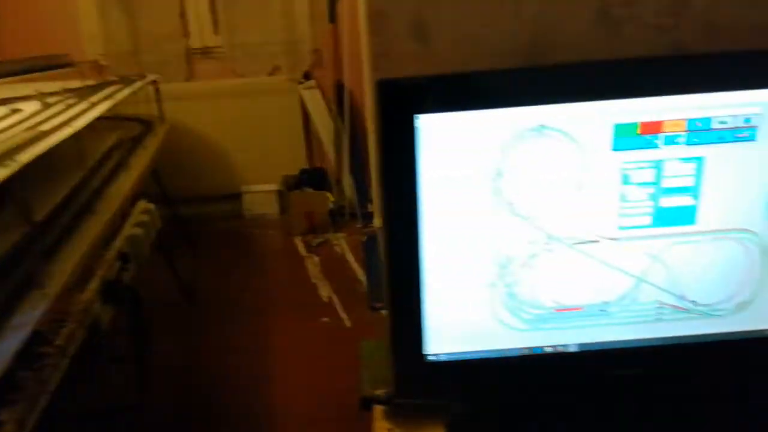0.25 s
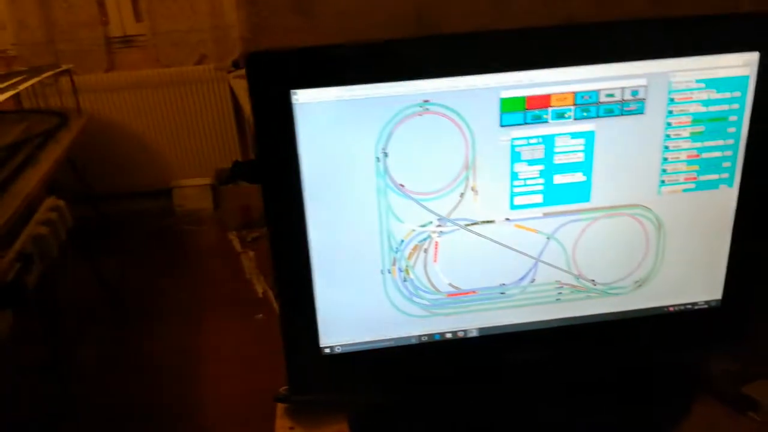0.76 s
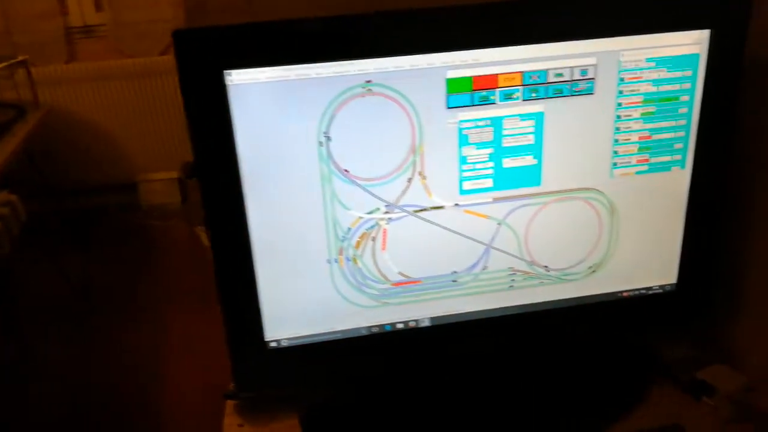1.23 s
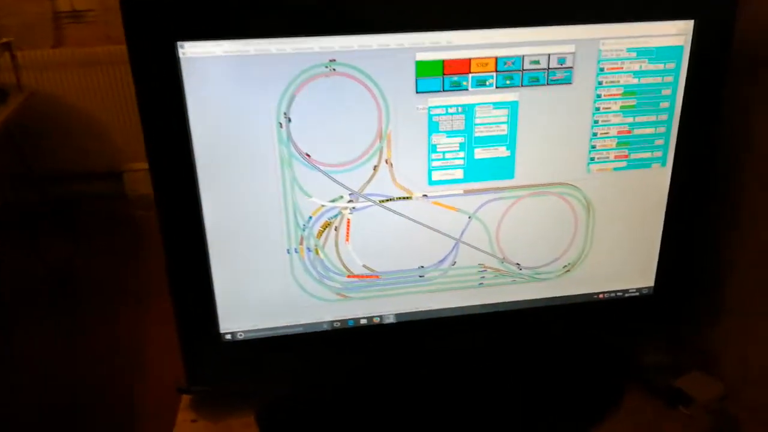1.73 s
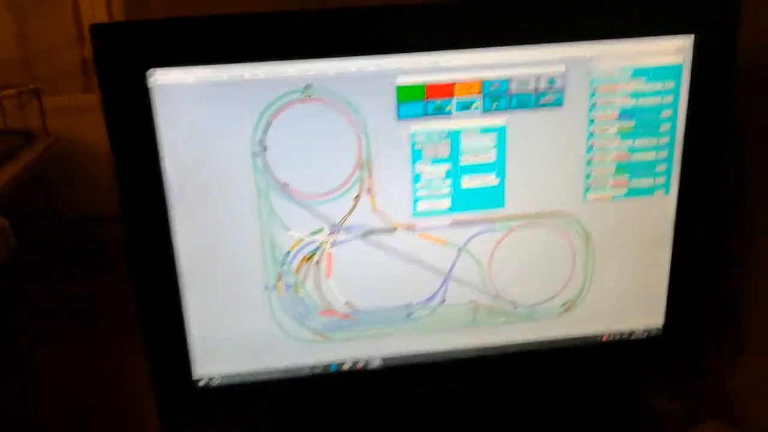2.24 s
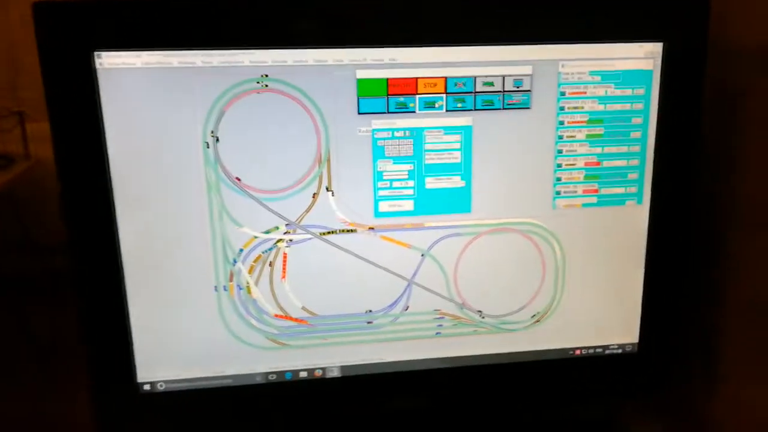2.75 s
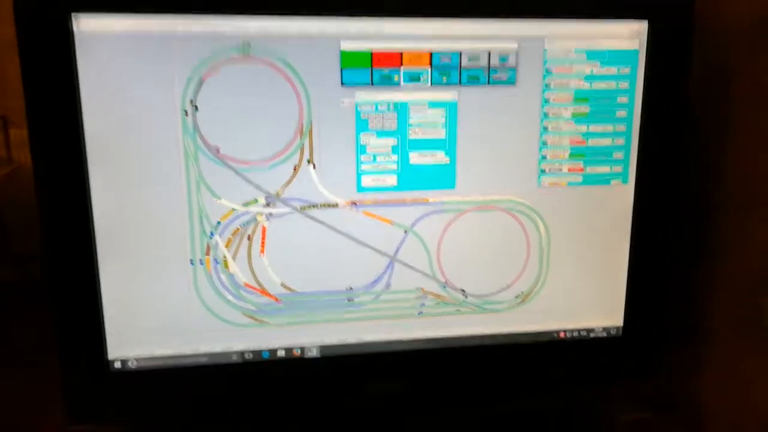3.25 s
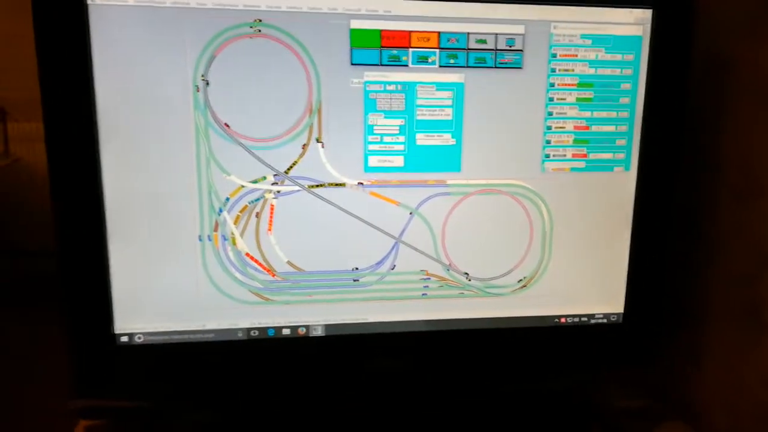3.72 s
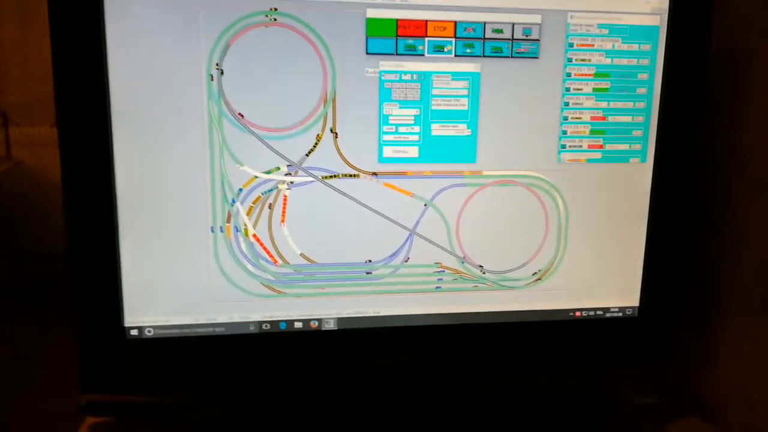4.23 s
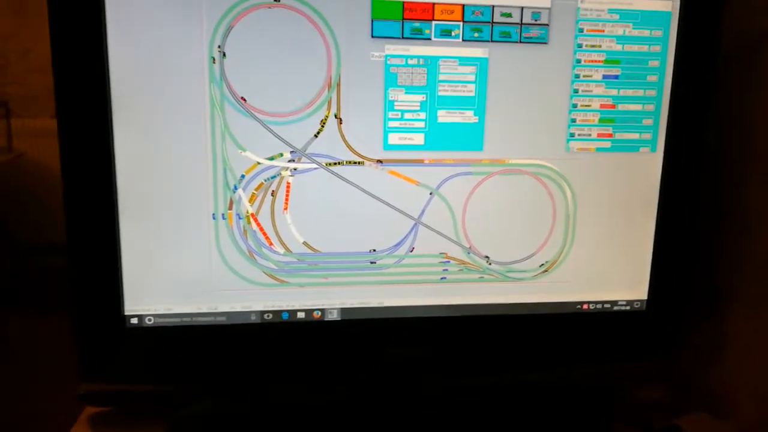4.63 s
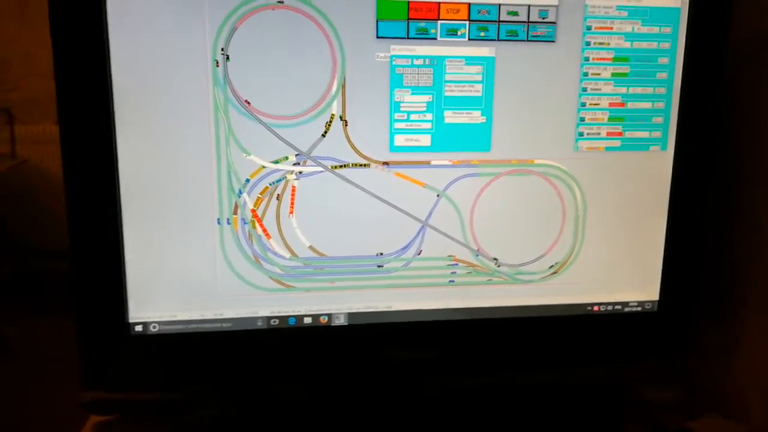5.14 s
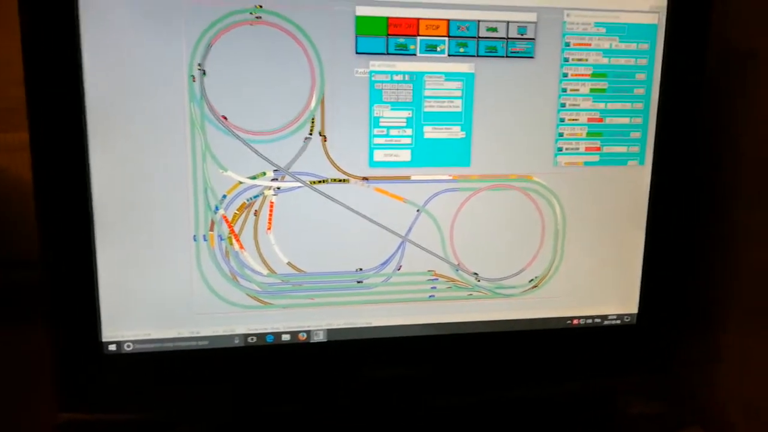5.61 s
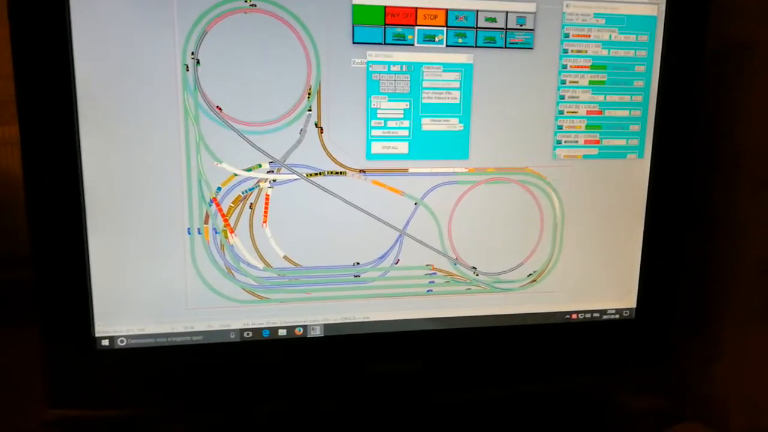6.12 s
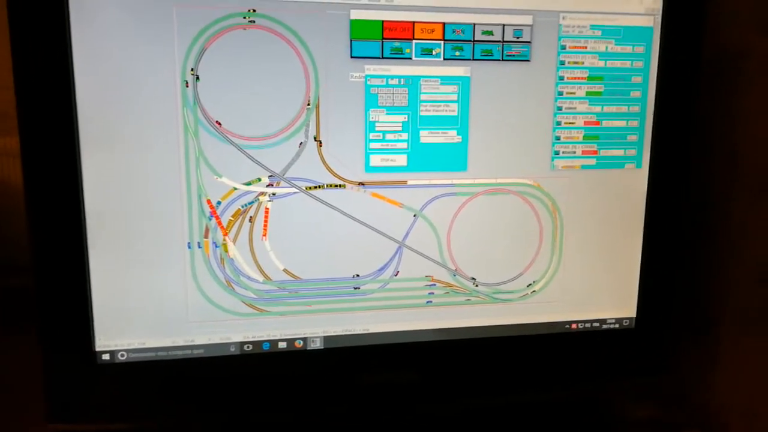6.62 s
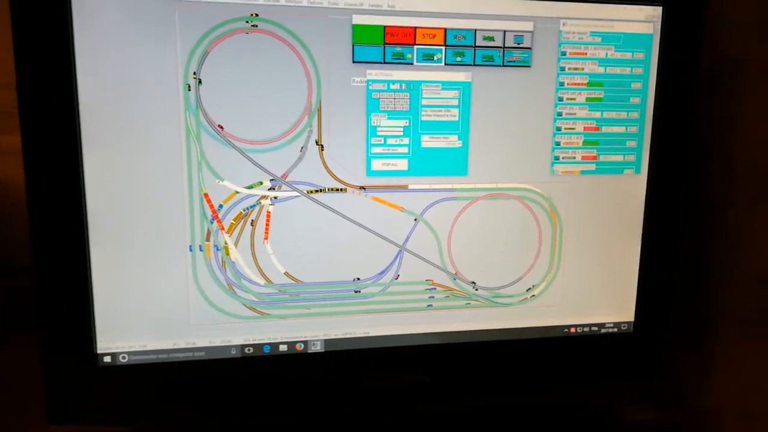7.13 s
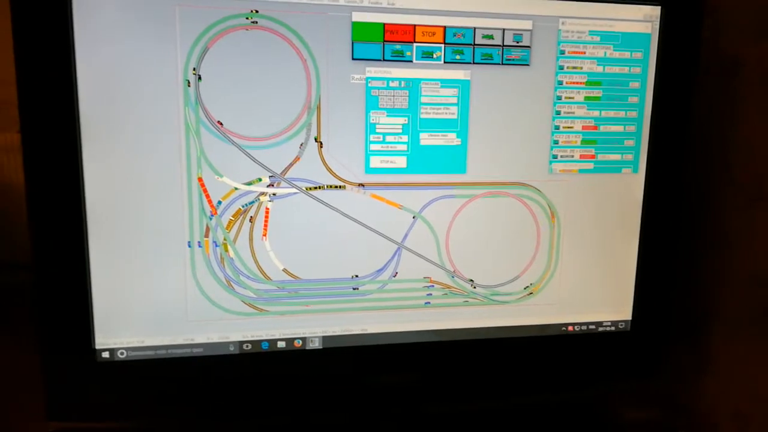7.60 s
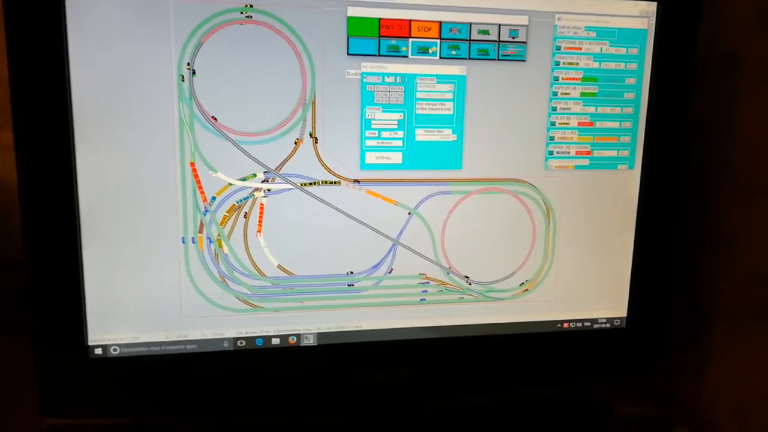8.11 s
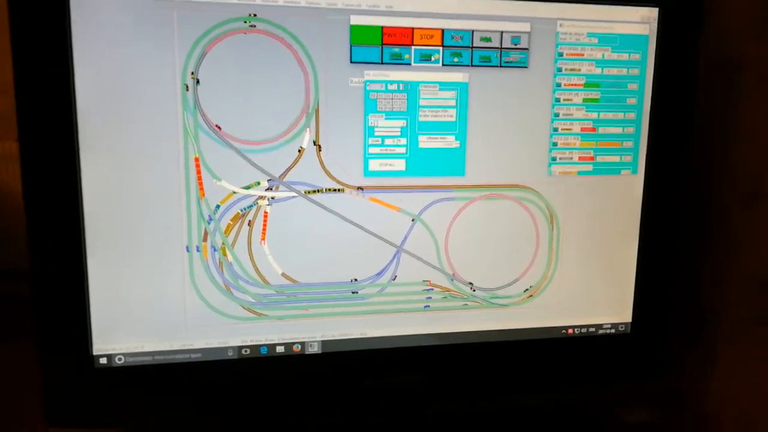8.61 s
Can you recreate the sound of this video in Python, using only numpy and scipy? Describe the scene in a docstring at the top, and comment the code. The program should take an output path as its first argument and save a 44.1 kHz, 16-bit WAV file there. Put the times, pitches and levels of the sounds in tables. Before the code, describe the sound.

A steady, airy rush of many small metal wheels on rails, stronger and brighter in the right microphone, duller in the shaded left. Beneath it a wooden board murmurs and rumbles with soft thumps. Irregular ticks with short rattles cross the rush, and wavering motor tones swell briefly. Early grip pops and low rubs sound very close; finally the rolling fades to a fainter hiss.

```python
"""Model trains roll round a layout in a small room, to the right of a hand-held phone.
From the start the wheels hiss (noise through resonances) and the baseboard drones in low modes.
Soon wheels clatter over joints (bursts of noise) and motors hum (narrow, fluttering noise).
From 0.7 s the hand pops dully on the phone's case (short pulses); from 2 s it also rubs (low noise).
The hiss sinks in the last second. The left microphone is shaded and hears late."""
import sys
import numpy as np
from scipy import signal
from scipy.fft import rfft, irfft, next_fast_len
from scipy.io import wavfile
from scipy.ndimage import uniform_filter1d, map_coordinates

SR = 44100
rng = np.random.default_rng(int(sys.argv[2]) if len(sys.argv) > 2 else 0)


def store_pcm(level_fs):
    """Save levels as 16-bit WAV."""
    pcm = np.round(np.clip(level_fs, -1, 1) * 32767).astype(np.int16)
    wavfile.write(sys.argv[1], SR, np.atleast_2d(pcm).T)


def volts_from_db(level):
    """Convert decibel levels to linear amplitude ratios."""
    exponent = np.asarray(level, float) / 20
    return 10 ** exponent


N = 390726  # length in samples

# How strongly the trains hiss, before random sway: time_s, right_level_db,
# left_extra_db (left microphone against its usual shading)
ROLLING = [(0, -26.5, 1.5), (.3, -25.5, 3), (.8, -27, 3), (1.15, -27, 3.5), (1.3, -25.5, 3),
           (2.0, -23.5, 2.5), (2.48, -25.5, 1.5), (2.57, -27.5, 1.5), (3.4, -27, 0), (4.3, -27.5, -1.5),
           (4.95, -27.5, -2.5), (5.35, -27.5, -2), (5.6, -28, -1.5), (6.25, -26.5, -2.5), (6.6, -28, -1.5),
           (6.9, -28, -2.5), (7.1, -29, -2), (8.1, -28.5, -2), (8.2, -31.5, -4), (8.545, -37.5, -9),
           (8.565, -33, -7), (8.65, -35, -9), (8.86, -33.5, -7)]


def unit(x):
    """Scaled to an rms (average strength) of 1."""
    return x / np.sqrt(np.mean(x ** 2) + 1e-20)


def along(points, hz):
    """Reads (Hz, value) points on a logarithmic frequency axis."""
    point_hz, value = np.transpose(points)
    return np.interp(np.log(hz + 1), np.log(point_hz + 1), value)


def curves(rows, t):
    """Reads each column after the time column at times t."""
    time_s, *columns = np.transpose(rows)
    return [np.interp(t, time_s, column) for column in columns]


def wobble(rate):
    """A smooth random curve with `rate` random points a second."""
    knots = rng.standard_normal(int(N * rate / SR) + 4)
    return map_coordinates(knots, [np.arange(N) * rate / SR])


def filtered(x, response):
    """Changes each frequency of x by a (possibly complex) response."""
    padded = next_fast_len(N + 8192)
    spectrum = rfft(x, padded) * response(np.fft.rfftfreq(padded, 1 / SR))
    return irfft(spectrum, padded)[..., :N]


def noise(colour):
    """Two unrelated noises of one colour, rms 1."""
    return unit(filtered(rng.standard_normal((2, N)), colour))


def coloured_noise(points):
    """Two noises shaped by (Hz, relative dB) points."""
    return noise(lambda hz: volts_from_db(along(points, hz)))


def modes(table):
    """The response of several resonances together, their signs alternating."""
    def response(hz):
        total = 0
        for k, (centre_hz, width_hz, db) in enumerate(table):
            damping = 1j * hz * width_hz
            total = total + (-1) ** k * volts_from_db(db) * damping / (centre_hz ** 2 - hz ** 2 + damping)
        return total
    return response


def steady(x, hold_s):
    """Evens out the slow chance swells of a sound over hold_s seconds."""
    power = abs(uniform_filter1d(x ** 2, size=round(hold_s * SR), axis=-1))
    return unit(x / np.sqrt(power + .05))


def patches(z, bins, frames, depth_db):
    """Gives a short-time spectrum soft random patches of louder and quieter sound."""
    field = rng.standard_normal(z.shape[1:])
    smooth = uniform_filter1d(uniform_filter1d(field, size=bins, axis=0), size=frames, axis=1)
    return z * volts_from_db(depth_db * unit(smooth))


def bump(hz, centre_hz, half_width_hz):
    """The outline of a resonance, 1 on top."""
    return 1 / (1 + ((hz[:, None] - centre_hz) / half_width_hz) ** 2)


def swell(start_s, end_s):
    """A smooth rise and fall between two times."""
    progress = np.clip((np.arange(N) / SR - start_s) / (end_s - start_s), 0, 1)
    return np.sin(np.pi * progress) ** 0.53


def ports(pair):
    """Right hears the first noise; left hears it late and shaded, mixed with the room's own second noise."""
    # Left microphone against right: pitch_hz, gain_db
    shade = [(60, 0), (200, -1), (350, -1), (520, -6.5), (780, -7), (1100, -4.5), (1900, -9.5),
             (2700, -10.5), (4300, -19), (6500, -27.5), (9500, -19.5), (11300, -20), (12300, -37),
             (15000, -40), (15500, -50)]
    # Likeness of the two microphones: pitch_hz, shared_part (0 to 1)
    alike = [(60, .98), (170, .96), (330, .55), (600, .65), (1000, .35), (1400, .55), (1900, .25),
             (4000, .55), (6500, .5), (9000, .1)]
    lag_s = 26 / SR

    def left_response(hz):
        share = np.clip(along(alike, hz), 0, 1)
        lag_at_hz = lag_s * np.clip(hz / 300, 0, 1)  # shorter below 300 Hz
        late = np.exp(-2j * np.pi * hz * lag_at_hz)
        return volts_from_db(along(shade, hz)) * [share * late, np.sqrt(1 - share ** 2)]

    left = filtered(pair, left_response).sum(0)
    return np.array([left, pair[0]])


def wheels():
    """Rough rails under many small wheels: hiss through resonances that trade strength."""
    # Basic colour of the hiss: pitch_hz, relative_level_db
    hiss = [(210, -36), (350, -21), (606, -15.5), (1050, -8.5), (2060, -4.5), (2280, -3), (3230, -1),
            (5580, -3), (8360, -14.5), (11000, -25.5), (14300, -49), (22000, -120)]
    # Colour of the finest hiss: pitch_hz, relative_level_db
    sheen = [(6000, -120), (8500, -32), (11000, 1.5), (13000, 4.5), (15800, 3)]
    # Rail and wheel resonances: centre_hz, half_width_hz
    rings = [(850, 210), (3150, 480), (4105, 340), (5850, 730)]
    # Changing colour: time_s, gain_db of each of the four rings, bright_edge_gain_db
    colour = [(0, 0.97, 1, 4, 1.5, -0.5), (.7, 2.5, -1.5, 2.5, 1.5, 1), (1.3, 0.78, -2, 3.5, 0, -1.5),
              (2.05, 0, 0.5, 8, 4, 2), (2.45, 0, 1, 6.5, 1.5, 9.5), (2.7, 0, 3, 2, -1, 10),
              (3.55, 0.68, 1, 6, 2, 5.5), (5.2, 0.41, 3, 3.5, 3, 2), (6.2, 0, 4.5, 6.5, 3, 2),
              (6.6, 1, 0.5, 5.5, 3, -0.5), (7.3, 1, 1.5, 4.5, 1.5, -3.5), (8.0, 1.8, 2.5, 0.5, 2, -4),
              (8.4, 2.7, -3, -1, 0, -4), (8.86, 2.3, 0, -1, -2, -3)]
    ring_sway_db = 0.74
    fine_mean_db, fine_follows, fine_sway_db = -46, .6, 1.2  # fine_follows: share of the hiss's swings
    car_s, car_peak_s, fine_car_db = .4375, 8.03, 1.5  # time between cars, a brightest moment, depth

    # thin lines in the hiss last a few tenths of a second
    z = signal.stft(coloured_noise(hiss), nperseg=4096)[2]
    lined = signal.istft(patches(z, 3, 6, depth_db=1.2), nperseg=4096)[1][:, :N]

    hz, t, z = signal.stft(lined, SR, nperseg=512)
    *rings_db, bright_db = curves(colour, t)
    colour_db = 0
    for ring_db, ring in zip(rings_db, rings):
        sway = np.interp(t * SR, np.arange(N), wobble(7))
        colour_db = colour_db + (ring_db + ring_sway_db * sway) * bump(hz, *ring)
    z = patches(z, 6, 12, 0.88) * volts_from_db(colour_db)
    # a nearer train is brighter, in the direct sound more than in the room's
    directness = np.array([1, .4])[:, None, None]
    z *= volts_from_db(bright_db * bump(hz, 8900, 2700) * directness)
    # even out the loudness, so that colour alone has changed
    z /= np.sqrt(uniform_filter1d(np.sum(abs(z[0]) ** 2, axis=0), size=20))
    even_hiss = unit(signal.istft(z, SR, nperseg=512)[1][:, :N])

    time_s = np.arange(N) / SR
    hiss_db, left_db = curves(ROLLING, time_s)
    cars = np.cos(2 * np.pi * (time_s - car_peak_s) / car_s)
    body = volts_from_db(hiss_db + 0.21 * cars + 0.75 * wobble(5) + .5 * wobble(14)) * even_hiss

    # the finest hiss flickers, and ticks as single axles catch the rail, about 25 times a second
    strength = volts_from_db(4.5 * np.minimum(rng.exponential(size=N), 2))
    catches = strength * (rng.random(N) < 25 / SR)
    ticks = signal.fftconvolve(catches, np.exp(-np.arange(900) / 130))[:N]
    flicker = volts_from_db(1.4 * wobble(6.3) + 0.81 * wobble(32)) + 0.42 * ticks
    fine_db = fine_mean_db + fine_follows * (hiss_db - hiss_db.mean())
    fine_db = fine_db + fine_sway_db * wobble(3.5) + fine_car_db * cars
    fine = volts_from_db(fine_db) * flicker * coloured_noise(sheen)

    left_gain = volts_from_db(left_db + 0.53 * wobble(4))
    return ports(body + fine) * [left_gain, np.ones(N)]


def baseboard():
    """Motors and wheels shake the board and the floor; each rings in its own low modes."""
    # Drone modes: centre_hz, width_hz, level_db, before the response is doubled in dB below
    board = [(106.4, 17.4, -4.5), (140.3, 15.2, -2), (160.6, 12, -2), (187.8, 12, -6.5)]
    # Wooden murmur modes: centre_hz, width_hz, level_db
    wood = [(224, 20.5, 0), (287, 12.2, -0.5), (350, 36, -5.5), (410, 24, -9.5)]
    # Colour of the floor rumble: pitch_hz, relative_level_db
    rumble_colour = [(12, -43), (20, -5), (38, -1.5), (75, -2.5), (110, -8), (140, -53), (240, -120)]
    # Board levels before random sway: time_s, drone_db, murmur_db
    drone_rows = [(0, -51, -58), (.1, -61, -64), (.3, -50, -46), (.57, -50, -55.5), (.68, -50.5, -58),
                  (1.1, -51.5, -58.5), (1.45, -51, -53), (1.6, -51, -52.5), (2.1, -47, -51),
                  (2.6, -49, -59.5), (2.9, -47, -51), (3.2, -48, -61.5), (3.6, -48, -52),
                  (4.05, -49.5, -61), (4.3, -50, -55), (4.65, -48, -55), (5.2, -49, -58),
                  (5.55, -55.5, -61.5), (6.3, -56.5, -62.5), (6.6, -52, -59.5), (7.05, -52, -57.5),
                  (7.4, -54, -62), (7.8, -51.5, -57.5), (8.2, -54.5, -57.5), (8.86, -55.5, -61.5)]
    # Floor rumble before random sway: time_s, level_db
    floor_rows = [(0, -64), (.55, -57), (1.0, -68), (1.55, -51), (1.8, -56), (2.0, -50), (2.1, -51),
                  (2.7, -55), (3.0, -59), (4.0, -57), (4.7, -58), (6.3, -59), (7.0, -55), (8.0, -51),
                  (8.4, -52.5), (8.86, -57)]
    # Heavy wheels thump the board: start_s, level_db before the soft rise
    thump_rows = [(1.53, -44), (2.75, -44), (3.08, -42), (3.31, -52), (3.5, -46), (4.82, -44), (6.03, -48),
                  (7.0, -42)]
    rise_s, fall_60db_s = 0.018, 0.26  # of a thump

    t = np.arange(N) / SR
    drone_db, murmur_db = curves(drone_rows, t)
    rumble_db, = curves(floor_rows, t)
    thumps = np.zeros(N)
    for start_s, db in thump_rows:
        since = np.clip(t - start_s, 0, None)
        thumps += volts_from_db(db - 60 * since / fall_60db_s) * (1 - np.exp(-since / rise_s))

    def sharpened(hz):
        response = modes(board)(hz)
        return response * abs(response)

    throb_db = 2.5 * wobble(8)
    drone_gain = volts_from_db(drone_db + throb_db + 0.97 * wobble(18)) + thumps
    drone = drone_gain * steady(noise(sharpened), 0.16)
    murmur_gain = volts_from_db(murmur_db + .6 * throb_db + 1.35 * wobble(5) + 2.25 * wobble(14))
    murmur = (murmur_gain + volts_from_db(-7.5) * thumps) * steady(noise(modes(wood)), 0.2)
    rumble = volts_from_db(rumble_db + 1.3 * wobble(5)) * coloured_noise(rumble_colour)
    return ports(drone + murmur + rumble)


def joints():
    """Each rail joint gives a sharp tick and a short clatter; the tick is in the bright noise alone."""
    # Wheels over the loudest joints: start_s, level_db (before the shapes below), clatter_decay_s
    near_joints = [(.0827, -39, .045), (.1491, -39, .045), (.2299, -34.5, .04), (.4758, -29, .045),
                   (.5985, -28, 0.062), (1.0036, -38, .045), (1.2391, -31.5, .035), (1.9734, -44, .045),
                   (2.4224, -42, .05), (2.8524, -37, .055), (3.0525, -35, 0.052), (3.2755, -38, .045),
                   (3.5433, -35, 0.068), (3.73, -40, 0.048), (4.0667, -43, .045), (4.3296, -36, 0.041),
                   (4.45, -42, 0.07), (4.8713, -39, 0.054), (5.3492, -37, 0.06), (5.8057, -38, 0.036),
                   (6.2073, -36, .045), (6.6563, -36, 0.068), (6.74, -37, .04), (7.1412, -33, 0.028),
                   (7.5443, -39, 0.049), (7.645, -39, 0.061), (7.9962, -40, 0.051), (8.5589, -41, 0.041)]
    # Colour of the clatter: pitch_hz, relative_level_db
    clack = [(2000, -120), (3000, -16), (6000, 10), (9000, 2), (12000, -1.5), (15800, 5)]
    far_count, far_db, far_spread_db, far_decay_s = 22, -12, 2.5, 0.046  # far_db: against the hiss
    dull_db, tick_db = 1, 3  # against the bright clatter

    # fainter joints at random times
    far_s = rng.random(far_count) * N / SR
    far_level_db = curves(ROLLING, far_s)[0] + far_db + far_spread_db * rng.standard_normal(far_count)
    far_joints = [(s, db, far_decay_s) for s, db in zip(far_s, far_level_db)]

    t = np.arange(SR // 3) / SR
    clatter, ticks = np.zeros((2, N + len(t)))
    for start_s, db, decay_s in [*near_joints, *far_joints]:
        start = round(start_s * SR)
        clatter[start:][:len(t)] += volts_from_db(db) * np.exp(-t / decay_s) * (1 - np.exp(-t / 0.0024))
        ticks[start:][:len(t)] += volts_from_db(db + tick_db - 60 * t / .006)  # falls 60 dB in 6 ms
    clatter, ticks = clatter[:N], ticks[:N]

    rattle = volts_from_db(1.6 * np.clip(wobble(150), -2, 2))
    # bright and dull noise part at 7000 Hz
    bright = noise(lambda hz: volts_from_db(along(clack, hz)) / (1 + (7000 / (hz + 1)) ** 4))
    dull = noise(lambda hz: volts_from_db(along(clack, hz)) / (1 + (hz / 7000) ** 4))
    return ports((clatter + ticks) * rattle * bright + volts_from_db(dull_db) * clatter * rattle * dull)


def motors():
    """Each motor tone is a narrow, wavering line: noise in one sharp resonance, fluttering in strength."""
    # Tones that swell and fade: start_s, end_s, pitch_hz, level_db (before the flutter)
    tones = [(0.14, .68, 142.6, -44), (0.183, .4, 410, -49.5), (.545, .75, 394, -55), (.15, .45, 1570, -47),
             (.955, 1.427, 1595, -43.5), (1.55, 1.85, 1950, -41), (2.9, 3.397, 277, -57.5),
             (3.2, 4.25, 158.6, -47), (3.7, 4.15, 132.8, -51), (3.3, 4.5, 227.5, -58.5),
             (6, 6.4, 158.4, -54.5), (7.3, 7.9, 152.9, -50.5)]
    width_share = 0.046  # of the pitch, before squaring narrows the resonance
    total = np.zeros((2, N))
    for start_s, end_s, pitch_hz, db in tones:
        resonance = modes([(pitch_hz, width_share * pitch_hz, 0)])
        line = steady(noise(lambda hz: resonance(hz) ** 2), 0.33)
        flutter = volts_from_db(2.4 * wobble(16))
        total += volts_from_db(db) * swell(start_s, end_s) * flutter * line
    return ports(total)


def hand():
    """A slip of the grip: one push between two recoils, reaching the left microphone a moment later."""
    # Pops on the case: start_s, push_level_db (before the added recoil), pitch_hz
    pops = [(0.732, -27, 330), (1.202, -20.5, 403), (1.251, -28.5, 350), (1.524, -19.5, 437),
            (1.687, -27, 302), (1.988, -21.5, 420), (1.998, -19.5, 497), (2.011, -25, 300),
            (2.11, -29, 260), (2.175, -25, 330), (2.196, -26, 260), (2.267, -28, 300), (2.866, -26, 260)]
    cross_s, left_db, recoil = 0.00088, -4, 0.53  # recoil: size of the added second recoil
    out = np.zeros((2, N))
    t = np.arange(-400, 800) / SR
    for start_s, db, pitch_hz in pops:
        start = round(start_s * SR) - 400
        for side, (late_s, gain_db) in enumerate([(cross_s, left_db), (0, 0)]):
            u = (t - late_s) * pitch_hz * np.pi
            push = (1 - 2 * u ** 2) * np.exp(-u ** 2)
            push = push - recoil * np.exp(-(u - 1.6) ** 2 / 2.0)
            out[side, start:][:len(t)] += volts_from_db(db + gain_db) * push
    return out


def rubs():
    """Skin drags on the case in short lumpy bursts of low noise."""
    # Rubs of the grip: start_s, length_s, level_db (before the lumps)
    strokes = [(1.976, 0.059, -36), (2.1, 0.057, -48), (2.157, 0.062, -38.5), (2.251, .03, -42),
               (2.695, 0.3, -46)]
    # Colour of the rubbing: pitch_hz, relative_level_db
    rub_colour = [(24, -35), (40, -12), (102, 0), (396, -7), (556, -8), (780, -8), (900, -22), (1170, -59),
                  (1980, -120)]
    stroke = sum(volts_from_db(db) * swell(start_s, start_s + length_s) for start_s, length_s, db in strokes)
    lumps = volts_from_db(2.3 * wobble(120))
    return ports(stroke * lumps * coloured_noise(rub_colour))


def scene():
    """Trains, board and hand together."""
    return wheels() + baseboard() + joints() + motors() + hand() + rubs()


def low_pass(x):
    """Removes everything above the highest recorded frequency."""
    return signal.sosfilt(signal.butter(12, 16680, fs=SR, output="sos"), x)


def record(dry):
    """The phone keeps only what lies below its band limit of 15870 Hz."""
    limited = filtered(dry, lambda hz: hz < 15870)
    return low_pass(limited)


dry = scene()
out = record(dry)
store_pcm(out)
```